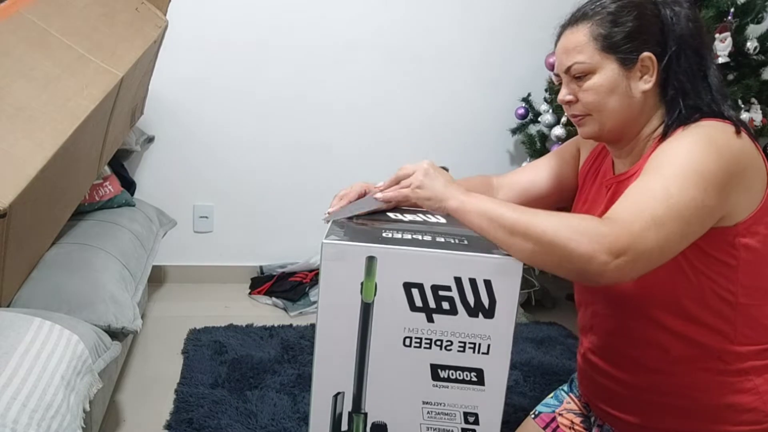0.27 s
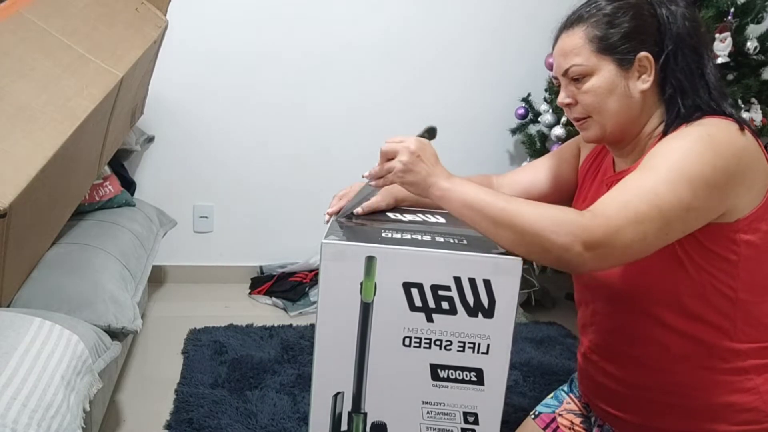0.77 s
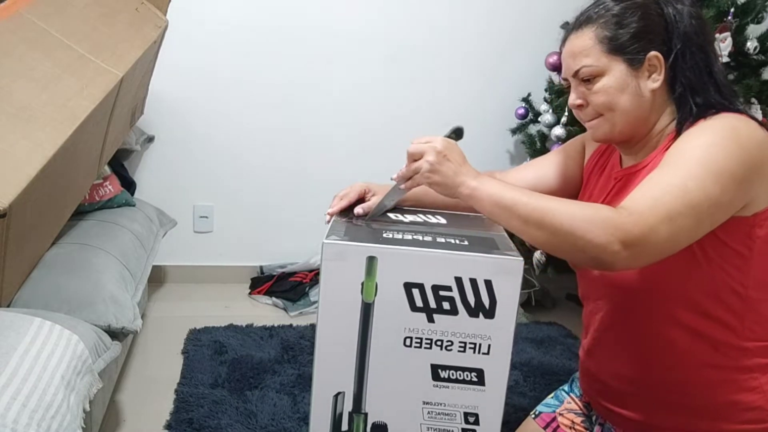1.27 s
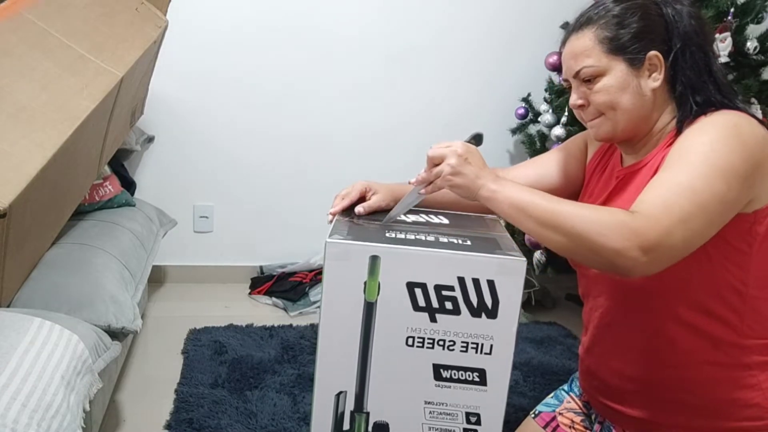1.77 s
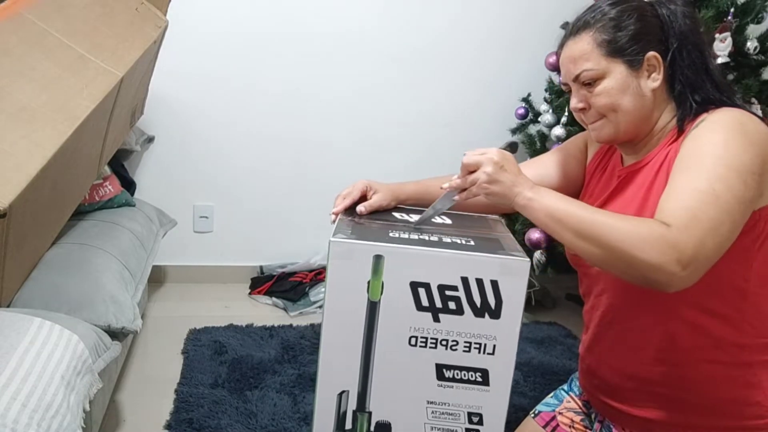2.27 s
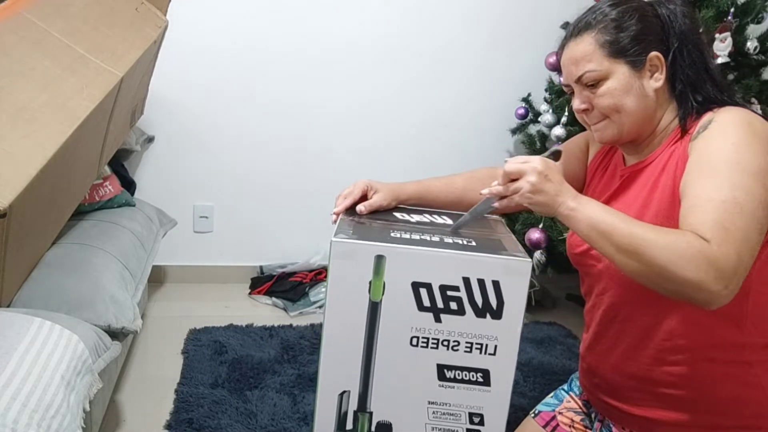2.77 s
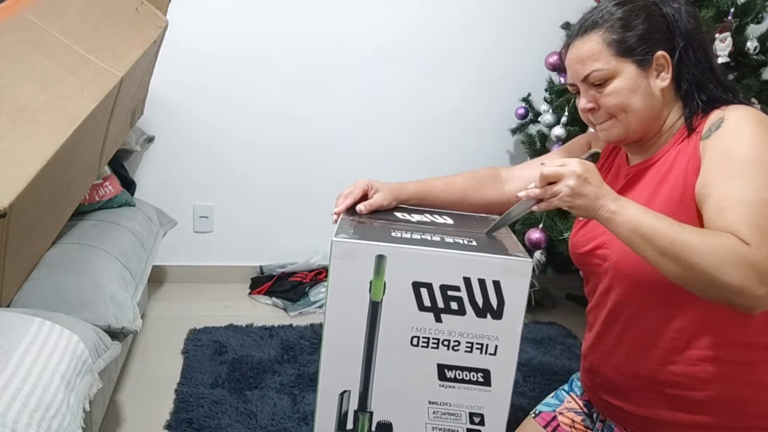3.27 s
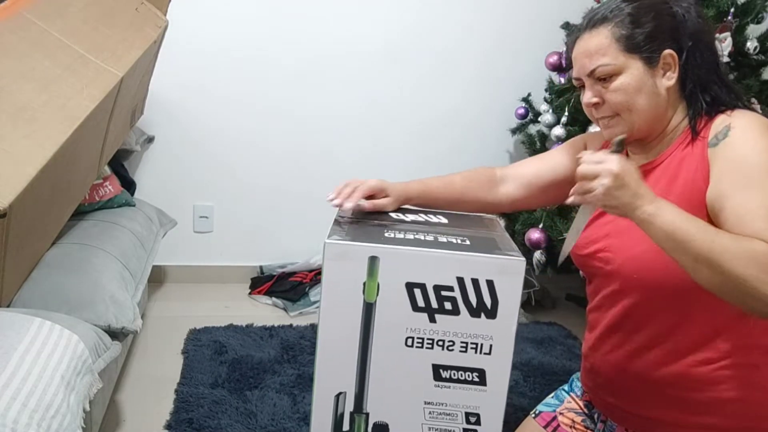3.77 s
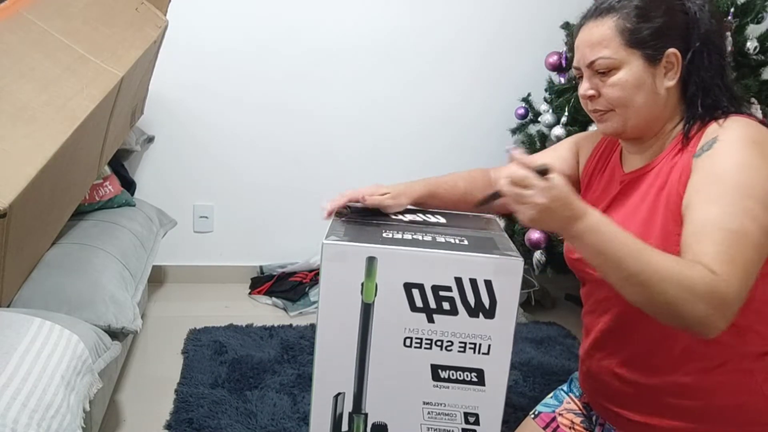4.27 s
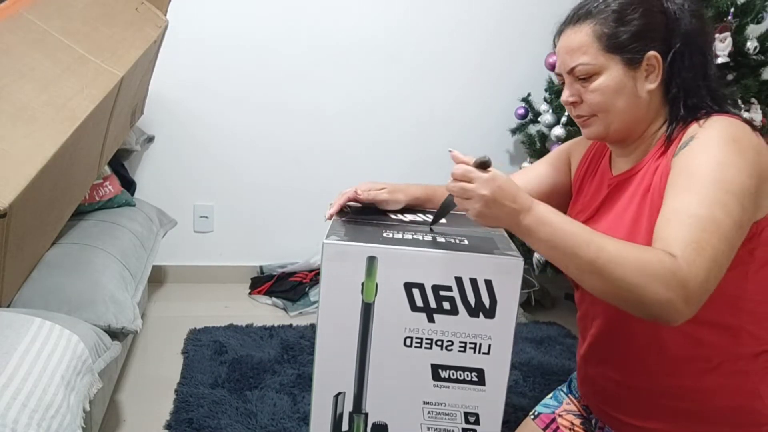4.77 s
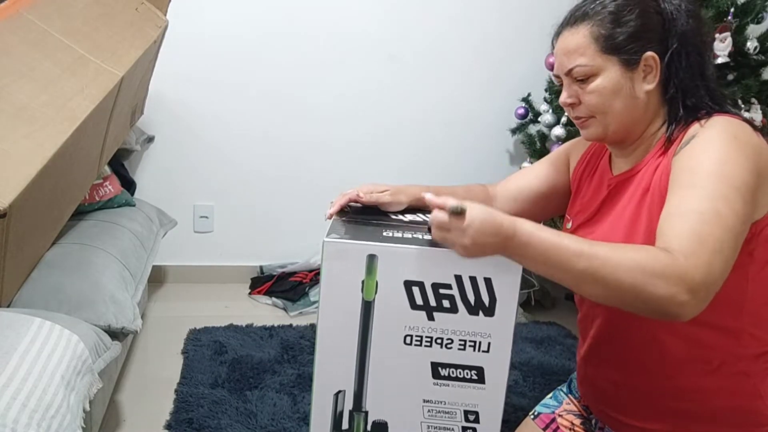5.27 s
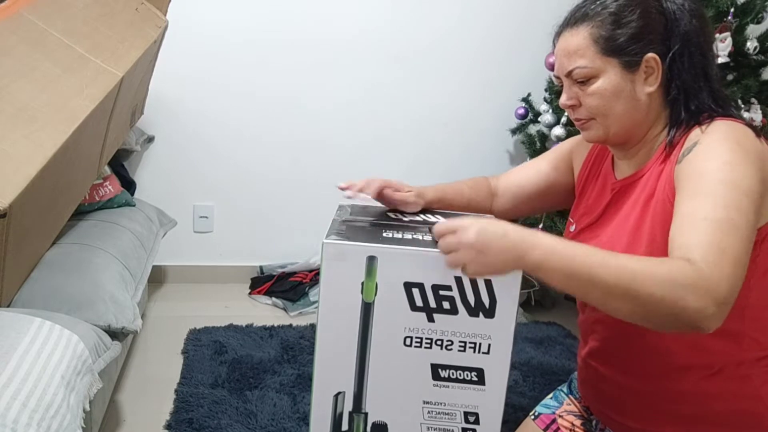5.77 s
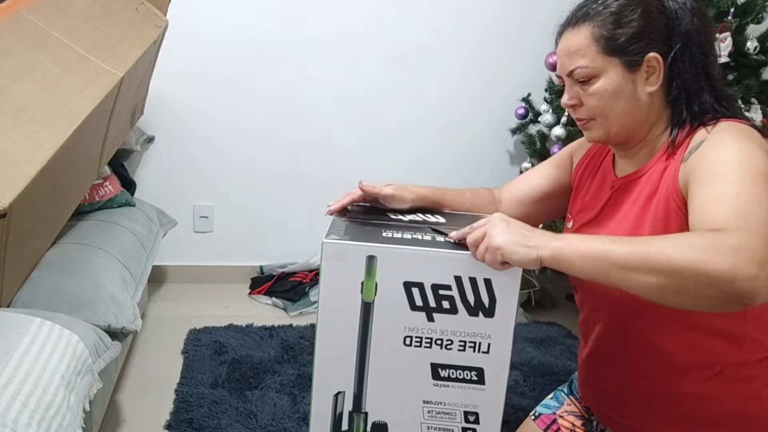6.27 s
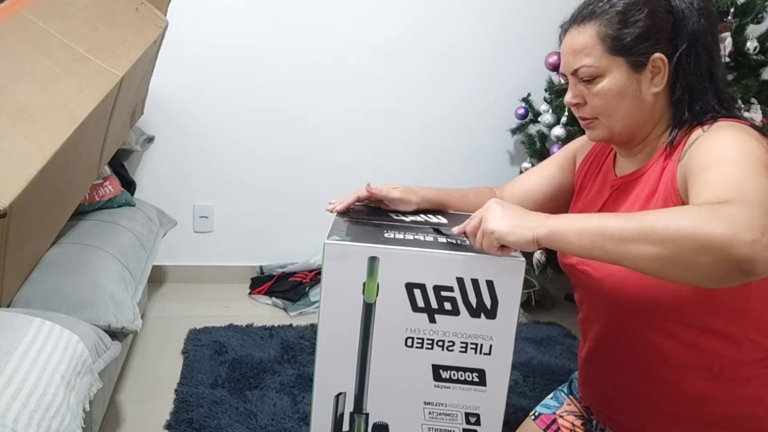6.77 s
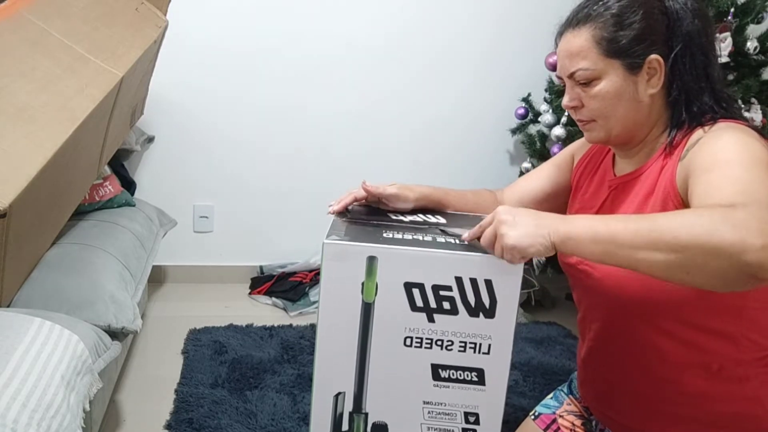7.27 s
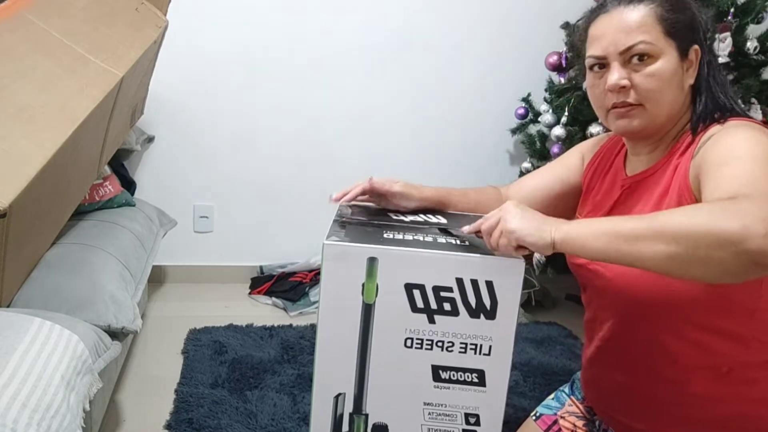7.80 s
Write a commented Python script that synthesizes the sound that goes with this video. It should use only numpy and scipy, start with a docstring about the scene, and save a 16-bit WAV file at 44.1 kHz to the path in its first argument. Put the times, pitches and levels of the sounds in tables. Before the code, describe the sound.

Close stereo pickup of a blade slitting packing tape on a big box: quiet touches, a hollow stab, a long juddering rasp with a deep thump midway, and a loud snapping burst as it breaks out. A tiny squeak and softer knocks follow, then irregular picking scrapes with one crisp tape snap. Short bright room echoes, faint steady hiss.

```python
"""A small tiled room: a kitchen knife slits the packing tape along a large cardboard box.
The blade punches in, drags along the seam, jerks through tough spots, bursts out at the far edge, then picks at
the remaining tape while hands shift on the lid. Random grains make the scraping, damped thuds the blows, clicks
the snapping tape and resonant bursts the rips and squeak. Box modes ring under blows and drags; walls echo.
A faint hiss lies beneath."""
import sys
import numpy as np
from scipy import signal
from scipy.fft import rfft, irfft, next_fast_len
from scipy.io import wavfile

SR = 44100
rng = np.random.default_rng(int(sys.argv[2]) if len(sys.argv) > 2 else 0)


def generate_wav(signal):
    """Clip the signal to [-1, 1] and save it as 16-bit WAV at the path in sys.argv[1]."""
    frames = np.transpose(np.atleast_2d(signal))
    scaled = np.clip(frames, -1, 1) * 32767
    pcm = np.round(scaled).astype(np.int16)
    wavfile.write(sys.argv[1], SR, pcm)


N = 354387
TIME = np.arange(N) / SR

# spectrum of the shaken box: freq_hz, relative density_db_per_hz
RUMBLE_SPECTRUM = [(30, -30), (70, -14), (120, -2), (240, 3), (330, -4), (480, -16.5), (800, -16.5),
                   (1600, -59)]
# spectrum of cardboard fibres: freq_hz, relative density_db_per_hz
CARDBOARD_SPECTRUM = [(150, -19.5), (350, 6.5), (600, 3), (900, 0.5), (1250, -1.5), (1700, -3), (2300, -18),
                      (4000, -19), (9000, -36.5)]
# spectrum of tape being split: freq_hz, relative density_db_per_hz
SLIT_SPECTRUM = [(800, -40), (2200, 1.5), (4000, -0.5), (6500, -1), (9500, 1.5), (13000, 3), (15500, 0)]


def from_db(db):
    """Decibels to gain."""
    return 10 ** (np.asarray(db) / 20)


def rms_one(x):
    """Scale to rms 1."""
    return x / np.sqrt(np.mean(x ** 2) + 1e-20)


def in_time(rows):
    """Each column of a curve at every sample."""
    s, *columns = np.transpose(rows)
    return [np.interp(TIME, s, column) for column in columns]


def at_hz(points, hz):
    """Read a table on a log-frequency axis."""
    table_hz, value = np.transpose(points)
    return np.interp(np.log(np.maximum(hz, 1)), np.log(table_hz), value)


def add(out, start_s, sound):
    """Mix a sound in at a time."""
    i = max(round(start_s * SR), 0)
    out[i:i + len(sound)] += sound[:N - i]


def through(x, response):
    """Convolve with an impulse response."""
    return signal.fftconvolve(x, response)[:N]


def impulse(spectrum, size=4096):
    """Minimum-phase response with a given spectrum shape; energy 1."""
    magnitude = from_db(at_hz(spectrum, np.fft.rfftfreq(size, 1 / SR)))
    cepstrum = irfft(np.log(magnitude))
    # fold the cepstrum onto positive time
    cepstrum[1:size // 2] *= 2
    cepstrum[size // 2 + 1:] = 0
    response = irfft(np.exp(rfft(cepstrum)))
    return response / np.linalg.norm(response)


def drift(rate_hz):
    """Random values joined by straight lines, rms 1."""
    count = int(rate_hz * N / SR) + 2
    values = rng.standard_normal(N)[:count]
    return rms_one(np.interp(TIME * rate_hz, np.arange(count), values))


def grains(per_s, spread_db):
    """Fibres giving way at random: clicks of uneven size and sign, rms 1."""
    size_db = spread_db * np.minimum(rng.exponential(1, N), 4)
    sizes = from_db(size_db) * rng.choice([-1, 1], N)
    return rms_one(sizes * (rng.random(N) < per_s / SR))


def blow(rise_s, decay_s):
    """Swell and fade of one blow, 1 s long; top 1."""
    t, rise_s = TIME[:SR], max(rise_s, 1e-4)
    swell = 1 - np.exp(-(t / rise_s) ** 2)
    shape = swell * np.exp(-np.maximum(t - rise_s, 0) / decay_s)
    return shape / shape.max()


def resonate(x, hz, q):
    """A two-pole resonance that keeps the power of white noise."""
    b, a = signal.iirpeak(hz, max(q, .4), fs=SR)
    return signal.lfilter(b, a, x + 1e-18) / np.sqrt(b[0])


def box(force):
    """Modes of the hollow box and its air ring on after a push; each resonator has its listed gain at its pitch."""
    # box modes: pitch_hz, gain_db, t60_s
    modes = [(79, -3, 0.54), (126, -2, 0.15), (157.9, 0, 0.16), (200.5, -6, 0.18), (223.2, -2.5, 0.17),
             (255.7, -5, 0.094), (286, 0, 0.33), (331.4, -0.5, 0.071), (382.2, 4.5, 0.21),
             (409, -4.5, 0.45), (518, -14, 0.5)]
    out = 0
    for hz, db, t60_s in modes:
        r = from_db(-60 / (t60_s * SR))
        w = 2 * np.pi * hz / SR
        b = np.array([1, 0, -1]) * (1 - r * r) / 2
        a = [1, -2 * r * np.cos(w), r * r]
        out = out + from_db(db) * signal.lfilter(b, a, force + 1e-18)
    return out


def dragging(judder_db=2.5, surge_db=1.0, ring_db=8, sizzle_db=-5.0, tick_db=-6):
    """The edge sticks and slips: coarse slips shake the box, finer ones rasp board and split tape, with stray ticks."""
    rumble, rasp, sizzle = strokes()
    grip = rms_one(from_db(judder_db * drift(rate_hz=70)))

    slips = through(grip * grains(per_s=900, spread_db=2.2), impulse(RUMBLE_SPECTRUM))
    shake = rumble * rms_one(slips + from_db(ring_db) * box(slips))

    fibres = grains(per_s=1500, spread_db=2.0)
    board = through(rasp * grip * fibres, impulse(CARDBOARD_SPECTRUM))

    splits = grains(per_s=3000, spread_db=3.0)
    surge = rms_one(from_db(surge_db * drift(rate_hz=12)))   # the tape yields in spurts
    ticks = grains(per_s=70, spread_db=2.5)
    cracks = splits + from_db(tick_db) * ticks
    tape = through(sizzle * grip * surge * cracks, impulse(SLIT_SPECTRUM))
    return shake + board + from_db(sizzle_db) * tape


def strokes(cut_rasp_db=-66.5, rasp_follows=0.48, rub_sag_db_per_s=42, rub_rasp_db=-4):
    """Strength of rumble, rasp and sizzle: force drives the first two in the long cut; a rub trades rumble for sizzle."""
    # long cut down the seam: time_s, force as rumble level_db, tape sizzle level_db before the sizzle trim
    cut = [(1.55, -70, -67), (1.72, -59.5, -68.5), (1.99, -51, -63), (2.1, -54, -61), (2.28, -60, -68),
           (2.42, -53, -58.5), (2.56, -48.5, -68), (2.72, -49, -58.5), (2.79, -55, -68.5),
           (2.97, -49.5, -59), (3.08, -48, -62.5), (3.3, -52, -60.5), (3.56, -55, -64)]
    # short rubs of blade and hands on the lid: start_s, length_s, level_db,
    # brightness_db (low on bare board, high on tape)
    rubs = [(0.13, 0.075, -63.5, 5), (0.895, 0.12, -60, -8.5), (1.05, 0.057, -66, 4.5),
            (3.66, 0.027, -44.5, 3), (3.80, 0.03, -53.5, -3), (4.02, 0.084, -56.5, -3),
            (4.30, 0.25, -65.5, -6), (5.16, 0.049, -63.5, -9), (5.244, 0.013, -60, -2),
            (5.375, 0.04, -66, -14.5), (5.487, 0.034, -55.5, -3), (5.59, 0.036, -67.5, 9.5),
            (5.99, 0.15, -58, -3), (6.239, 0.11, -61.5, -3), (6.368, 0.085, -54.5, 0.5),
            (6.521, 0.1, -57, -3.5), (6.846, 0.025, -51.5, -4), (6.95, 0.044, -57.5, -11),
            (7.046, 0.014, -53, -4), (7.204, 0.041, -53.5, -3.5), (7.273, 0.089, -54, -6),
            (7.533, 0.022, -52, -4), (7.575, 0.12, -57, 3.5), (7.778, 0.061, -56.5, -2.5)]
    force_db, sizzle_db = in_time(cut)
    (start_s, *_, end_s), listed_db, _ = np.transpose(cut)
    swing_db = force_db - listed_db.mean()
    rasp_db = cut_rasp_db + rasp_follows * swing_db   # cut_rasp_db holds at mean force
    out = contact(start_s, end_s - start_s, 0) * from_db([force_db, rasp_db, sizzle_db])
    for s, length_s, db, bright_db in rubs:
        layer_db = [db - bright_db, db + rub_rasp_db, db + bright_db]
        out += np.outer(from_db(layer_db), contact(s, length_s, rub_sag_db_per_s))
    return out


def contact(start_s, length_s, sag_db_per_s, attack_s=0.0052, release_db_per_s=192):
    """Pressure of one stroke: a quick bite, a hold that may sag, a release."""
    t = np.maximum(TIME - start_s, 0)
    fall_db = sag_db_per_s * t + release_db_per_s * np.maximum(t - length_s, 0)
    return np.minimum(t / attack_s, 1) * from_db(-np.minimum(fall_db, 200))


def knocks(flex_s=0.0056, stiffen=.15, crunch_s=0.016, crackle_s=0.0055, ring_db=10, shudder_db=-19):
    """The lid flexes with a damped thud that sets the box ringing, while fibres and tape give way in a burst."""
    # blows on the box: start_s, thud peak_db, thud pitch_hz, rise_s, thud fade_s, crunch level_db
    blow_rows = [(0.949, -43.5, 169, 0.0064, 0.012, -54), (1.072, -45, 132.4, 0.0026, 0.012, -75),
                 (1.3959, -23, 196, 0.0017, 0.0064, -35), (1.409, -25.5, 164.6, 0.0029, 0.035, -46),
                 (2.435, -25, 125, 0.012, 0.017, -48), (2.447, -18.5, 239.4, 0.0082, 0.013, -41.5),
                 (2.519, -37, 279, 0.007, 0.012, -64), (3.594, -24.5, 326, 0.0014, 0.016, -32),
                 (3.681, -28, 202, 0.0012, 0.0054, -40.5), (3.884, -28, 212, 0.0013, 0.0078, -48),
                 (4.577, -36, 234, 0.0024, 0.02, -56.5), (4.834, -37, 155, 0.014, 0.0066, -68.5),
                 (4.922, -45.5, 308, 0.0031, 0.0053, -64.5), (5.21, -33.5, 140, 0.0056, 0.01, -50),
                 (5.212, -27, 220.5, 0.005, 0.016, -58), (5.226, -33, 358, 0.0038, 0.0075, -55.5),
                 (5.548, -41.5, 332, 0.0014, 0.0087, -61), (6.335, -42.5, 198, 0.00071, .008, -47.5),
                 (6.3656, -33, 324, 0.00041, 0.0057, -54), (6.852, -41, 217, 0.021, 0.036, -54.5),
                 (7.054, -32, 214, 0.013, 0.012, -56.5), (7.539, -46, 170, 0.0056, 0.017, -72)]
    # crackle level at a reference crunch; growth in dB per dB of crunch
    crackle_ref_db, crunch_ref_db, crackle_growth = -49, -42, 1.12
    highpass = signal.butter(2, 85, "high", fs=SR, output="sos")   # a small panel radiates little bass
    thuds, shudder, crunch, crackle = np.zeros((4, N))
    for s, thud_db, hz, rise_s, fade_s, crunch_db in blow_rows:
        # the panel stiffens as it is pushed in, so its pitch climbs through the blow
        pitch_hz = hz * (1 + stiffen * np.tanh(TIME[:SR] / (rise_s + flex_s) - 1))
        flex = blow(rise_s, fade_s) * np.sin(2 * np.pi * np.cumsum(pitch_hz) / SR)
        flex = signal.sosfilt(highpass, flex)
        thud = flex + from_db(ring_db) * box(flex)
        crackle_db = crackle_ref_db + crackle_growth * (crunch_db - crunch_ref_db)
        add(thuds, s, -from_db(thud_db) * thud / np.abs(thud).max())
        add(shudder, s, from_db(thud_db + shudder_db) * blow(rise_s, crunch_s))
        add(crunch, s, from_db(crunch_db) * blow(rise_s, crunch_s))
        add(crackle, s, from_db(crackle_db) * blow(rise_s, crackle_s))
    shudder = through(shudder * grains(per_s=2000, spread_db=1.5), impulse(RUMBLE_SPECTRUM))
    crunch = through(crunch * grains(per_s=1800, spread_db=3.0), impulse(CARDBOARD_SPECTRUM))
    crackle = through(crackle * grains(per_s=11000, spread_db=5.0), impulse(SLIT_SPECTRUM))
    return thuds + shudder + crunch + from_db(7.0) * box(crunch + shudder) + crackle


def snaps(build_s=0.00038, tear_s=0.001, tear_share=0.9):
    """Tape frays, parts with one sharp click and tears on for about a millisecond; the blade taps the cardboard."""
    # tape snapping and the tip catching: time_s, click peak_db before tape colouring, cardboard tap peak_db
    snap_rows = [(0.8976, -50, -49), (1.0748, -32, -59), (1.3965, -14.5, -25), (1.5948, -36, -51),
                 (2.45, -23, -39), (2.8138, -29.5, -66), (3.5951, -7, -25), (3.6049, -18, -29),
                 (3.6678, -18, -33), (3.6819, -15.5, -26), (3.8839, -25, -31), (3.9093, -28, -44),
                 (4.039, -34.5, -49), (4.3812, -34.5, -42), (4.8311, -59, -47.5), (5.2143, -37, -38),
                 (5.3977, -38, -64), (5.4412, -41, -44.5), (5.4863, -35.5, -44), (5.5963, -37.5, -50),
                 (5.9995, -33.5, -47), (6.0724, -29, -44), (6.2249, -25, -40), (6.3355, -30, -29.5),
                 (6.3461, -36, -36), (6.3652, -9.5, -28.5), (6.3823, -22, -47), (6.5255, -46, -40),
                 (6.645, -35, -47), (7.2081, -30, -45), (7.2726, -25.5, -39), (7.435, -30.5, -56),
                 (7.564, -31, -57), (7.6016, -27.5, -51), (7.6175, -28, -50), (7.6653, -27, -54),
                 (7.7683, -21.5, -42)]
    # spectrum of snapping tape: freq_hz, relative density_db_per_hz
    tape_spectrum = [(500, -20), (1500, -3), (2800, -1), (4500, 0), (6500, 0), (9500, 4), (13000, -0.5),
                     (15500, -1)]
    clicks, taps = np.zeros((2, N))
    lead = SR // 200   # samples before the click
    t = np.arange(-lead, lead) / SR
    for s, click_db, tap_db in snap_rows:
        tear = rng.standard_normal(len(t)) * np.exp(np.minimum(t / build_s, -t / tear_s))
        tear *= tear_share / np.linalg.norm(tear)
        tear[lead] = 1
        add(clicks, s + t[0], from_db(click_db) * tear)
        add(taps, s, from_db([tap_db]))
    board = impulse(CARDBOARD_SPECTRUM)
    return through(clicks, impulse(tape_spectrum)) + through(taps, board / np.abs(board).max())


def rips(rise_s=0.00029):
    """Tape lets go in a quick run of tiny cracks, coloured by the free strip or flap."""
    # short rips and flicks of tape and flap edge: start_s, level_db, fade_s, centre_hz, q
    rip_rows = [(0.898, -62, 0.053, 616, 2.8), (1.397, -47.5, 0.017, 2580, 5.6),
                (1.412, -38.5, 0.04, 358, 2.7), (2.457, -47, 0.0052, 1450, 4),
                (2.468, -49.5, 0.021, 805, 7.2), (3.599, -34.5, 0.016, 1190, 4.5),
                (3.683, -41, 0.015, 4200, 1.2), (5.216, -56, 0.022, 1700, 0.93),
                (5.25, -56.5, .018, 4480, 0.84), (5.547, -58.5, 0.021, 2480, 2.4),
                (6.001, -61.5, 0.048, 3860, 1.8), (6.3368, -39.5, 0.009, 1560, 1.2),
                (6.3655, -35, 0.0076, 1510, 0.76), (6.525, -52, 0.02, 2100, 0.8),
                (6.965, -62, 0.041, 2670, 1.9), (7.56, -56, 0.085, 3860, 0.9),
                (7.785, -59.5, 0.054, 3800, 2.3)]
    cracks, out = grains(per_s=900, spread_db=2.5), np.zeros(N)
    for s, db, fade_s, hz, q in rip_rows:
        force = np.zeros(N)
        add(force, s, from_db(db) * blow(rise_s, fade_s))
        out += resonate(force * cracks, hz, q)
    return out


def squeak(rise_s=0.018, fade_s=0.027, treble_damping=1.5):
    """Light, uneven friction on glossy tape sings in narrow partials over a broad rasp; higher ones die sooner."""
    # the one squeak: start_s, level_db
    start_s, level_db = (4.076, -53)
    # its partials: pitch_hz, q, relative level_db
    partials = [(3810, 25, -5), (4066, 80, 0), (4170, 40, -8), (4340, 70, -8), (4860, 64, -5),
                (5160, 30, -9), (6640, 69, -4), (6400, 43, -3), (7400, 70, -0.5), (9350, 25, -11),
                (5500, 1.5, -4)]
    friction, out = grains(per_s=2000, spread_db=1.5), np.zeros(N)
    for hz, q, db in partials:
        swell = np.zeros(N)
        partial_fade_s = fade_s * (partials[0][0] / hz) ** treble_damping
        add(swell, start_s, blow(rise_s, partial_fade_s))
        tone = rms_one(resonate(resonate(friction, hz, q), hz, q))
        out += from_db(db) * swell * tone
    gains = from_db(np.array(partials)[:, 2])
    return from_db(level_db) * out / np.linalg.norm(gains)


def room(x, spill, count=9):
    """Sideways spill returns from the walls; crossfaded echo patterns shift as knife and arms move along the box."""
    out = np.array([x, x])
    moments_s = np.linspace(0, TIME[-1], count)
    for share in np.eye(count):
        weight = np.sqrt(np.interp(TIME, moments_s, share))
        near = weight > 0
        for channel, tail in zip(out, room_tail()):
            echo = signal.fftconvolve((weight * spill)[near], tail)
            add(channel, TIME[near][0], echo)
    return out


def room_tail(first_echo_s=0.0012):
    """Hard walls and floor return a diffuse stereo tail that dies sooner in the treble."""
    # echo decay: freq_hz, t60_s
    decay_times = [(100, 0.9), (300, 0.68), (700, 0.41), (2000, 0.41), (5000, 0.29), (14000, 0.23)]
    # echo strength: freq_hz, echo over spill_db
    echo_levels = [(100, -18.5), (300, -5.5), (700, 1.5), (2000, 0.5), (6000, 4), (14000, -2)]
    t, hz = TIME[:SR], np.fft.rfftfreq(SR, 1 / SR)
    noise, tail = rfft(diffuse(size=SR)), 0
    centres_hz = np.geomspace(80, 16000, 12)
    for centre_hz, share in zip(centres_hz, np.eye(len(centres_hz))):
        onset = np.clip(t / first_echo_s - 1, 0, 1)
        fade = from_db(-60 * t / at_hz(decay_times, centre_hz)) * onset
        band = irfft(noise * np.interp(hz, centres_hz, share), SR)
        tail = tail + band * from_db(at_hz(echo_levels, centre_hz)) * fade / np.linalg.norm(fade)
    return tail


def diffuse(size):
    """Stereo white noise, most alike in the upper bass and unrelated in the treble."""
    # left-right likeness of diffuse sound: freq_hz, correlation
    likeness = [(30, 0), (100, 0.23), (250, 0.68), (500, 0.32), (1000, 0)]
    alike = np.clip(at_hz(likeness, np.fft.rfftfreq(size, 1 / SR)), -1, 1)
    mid, side = rfft(rng.standard_normal((2, size)))
    spectra = np.sqrt(1 + alike) * mid + np.sqrt(1 - alike) * side * [[1], [-1]]
    return rms_one(irfft(spectra, size))


def background_hiss():
    """Diffuse noise, spectrally shaped, whose faint level sinks and recovers."""
    # hiss spectrum: freq_hz, relative density_db_per_hz
    hiss_spectrum = [(25, -23), (50, 9.5), (110, 16.5), (250, 15.5), (400, 11), (700, 5.5), (1600, 1.5),
                     (2300, -0.5), (4500, -2.5), (7000, -6.5), (10000, -9), (15500, -7.5)]
    # hiss course: time_s, level_db
    hiss_course = [(0, -59.5), (1.3, -59.5), (3.5, -60), (4.3, -61.5), (5.1, -62), (5.8, -60.5), (8, -59.5)]
    noise = diffuse(size=next_fast_len(N))
    hiss = np.array([through(side, impulse(hiss_spectrum)) for side in noise])
    return from_db(in_time(hiss_course)[0]) * hiss


def scene(snap_spill_db=-5, scrape_spill_db=2):
    """Knife and box in the room, over hiss; snaps face the microphone, scrapes radiate up from the lid."""
    hiss = background_hiss()
    scrapes = dragging() + rips() + squeak()
    blows, clicks = knocks(), snaps()
    spill = blows + from_db(snap_spill_db) * clicks + from_db(scrape_spill_db) * scrapes
    return room(blows + clicks + scrapes, spill) + hiss


def port(x, resonances):
    """A microphone port's peaks and notches."""
    for hz, q, db in resonances:
        w, gain = 2 * np.pi * hz / SR, from_db(db / 2)
        width = np.sin(w) / (2 * q) * np.array([1, 0, -1])
        centre = np.array([1, -2 * np.cos(w), 1])
        x = signal.lfilter(centre + width * gain, centre + width / gain, x)
    return x


def record(dry):
    """Each port colours its channel; a steep lowpass cuts the top."""
    # left microphone port: freq_hz, q, gain_db
    left_port = [(8200, 4.6, -8.5), (11720, 2.68, 15), (13400, 6.7, 1.5)]
    # right microphone port: freq_hz, q, gain_db
    right_port = [(7450, 11.4, -7), (9260, 4.2, 13), (11100, 20, -4), (12300, 5.8, 0.5)]
    cutoff_hz = 15550
    coloured = np.array([port(dry[0], left_port), port(dry[1], right_port)])
    lowpass = signal.ellip(10, .2, 80, cutoff_hz, fs=SR, output="sos")
    return signal.sosfilt(lowpass, coloured)


dry = scene()
out = record(dry)
generate_wav(out)
```